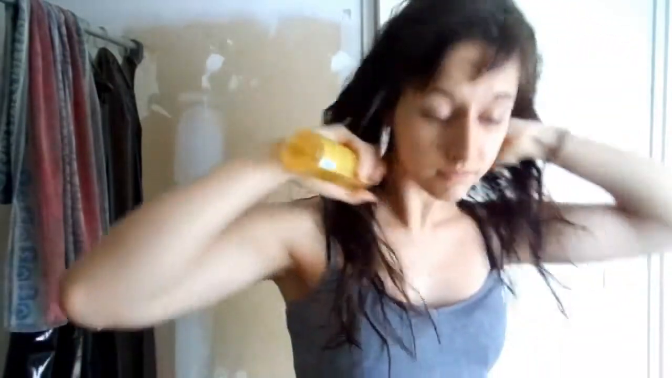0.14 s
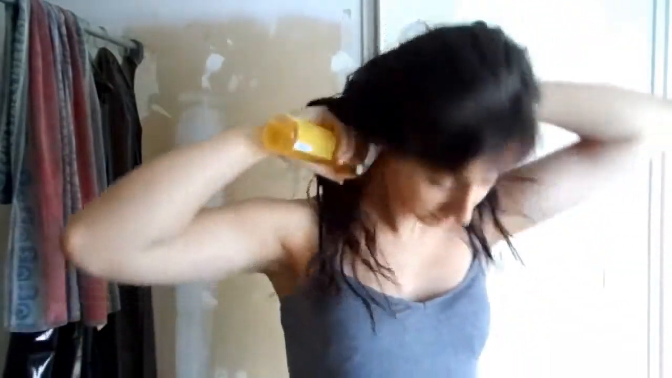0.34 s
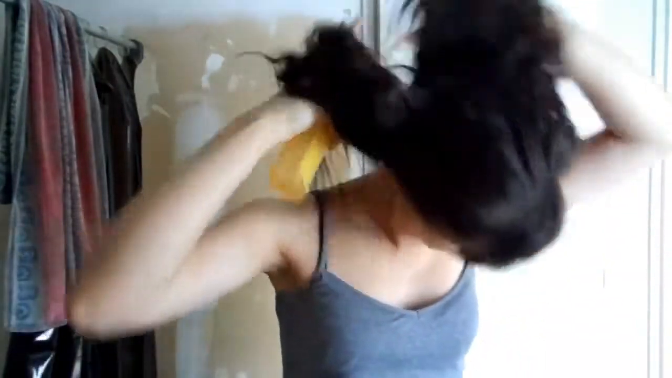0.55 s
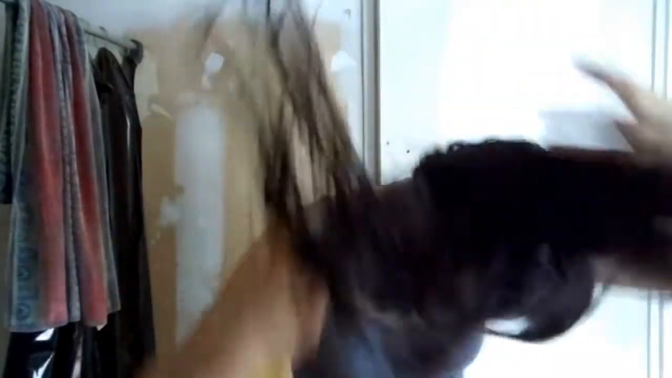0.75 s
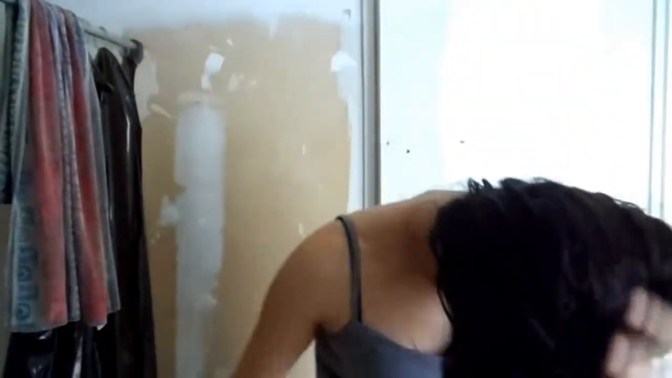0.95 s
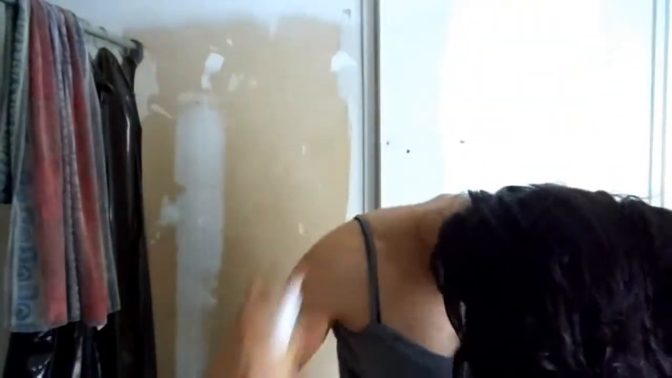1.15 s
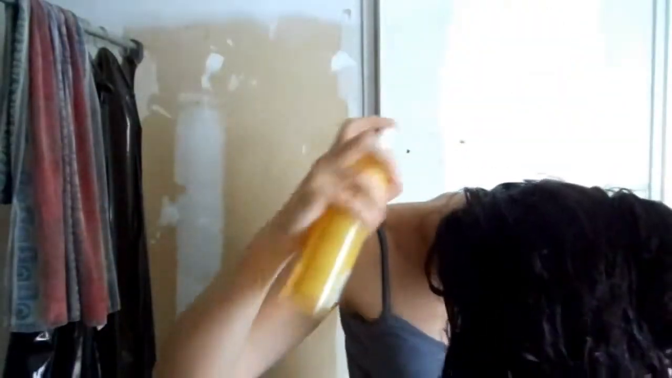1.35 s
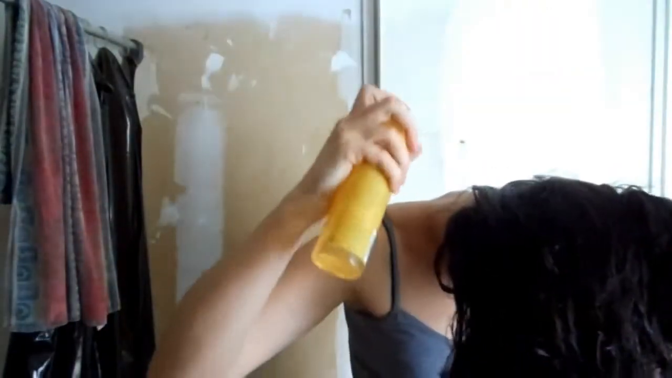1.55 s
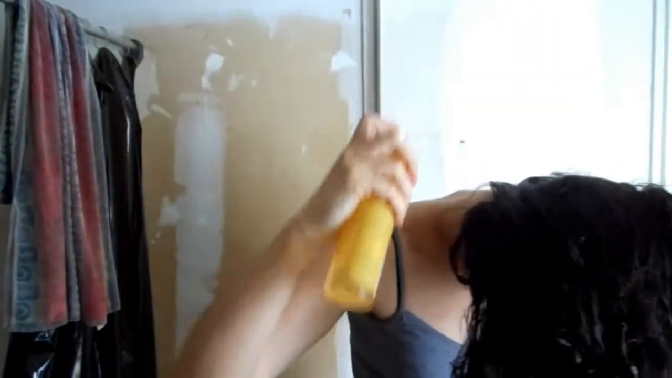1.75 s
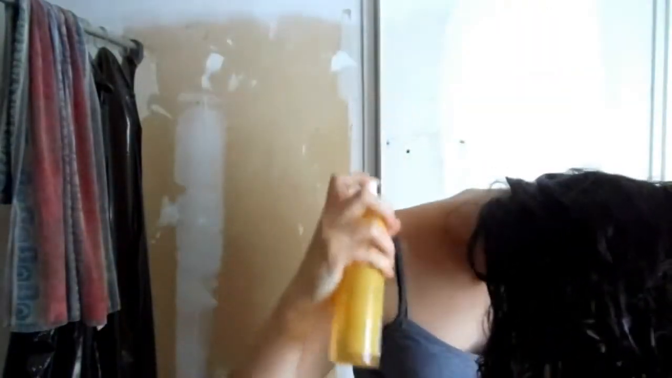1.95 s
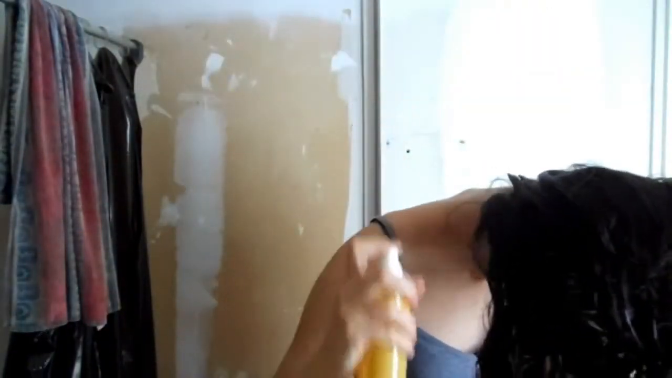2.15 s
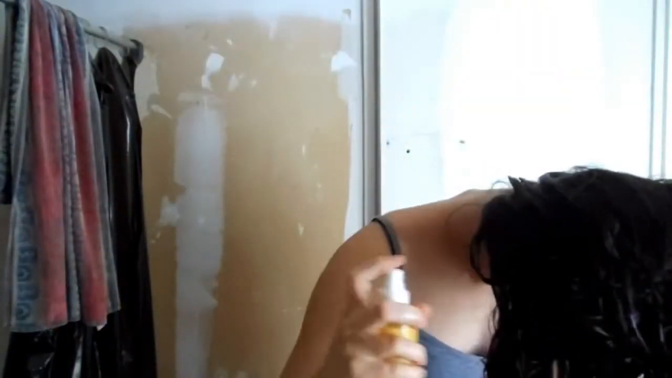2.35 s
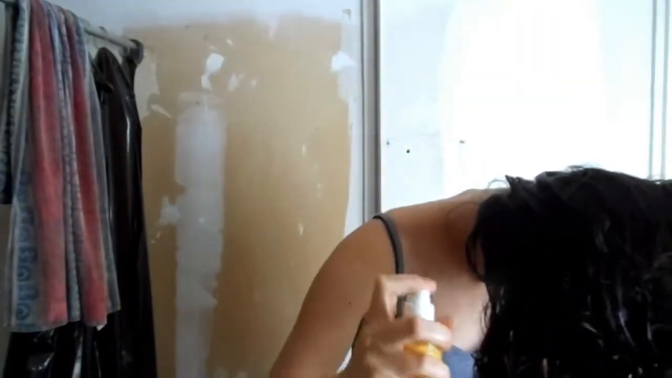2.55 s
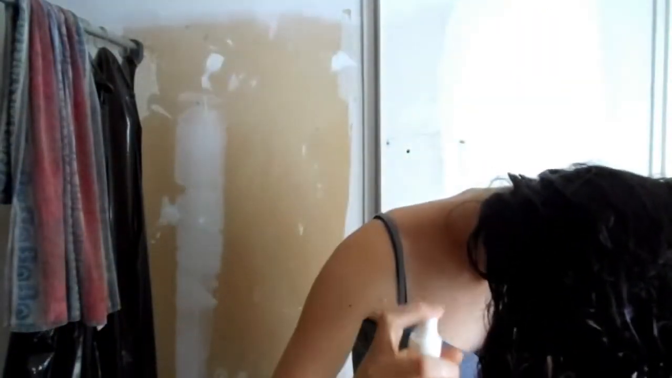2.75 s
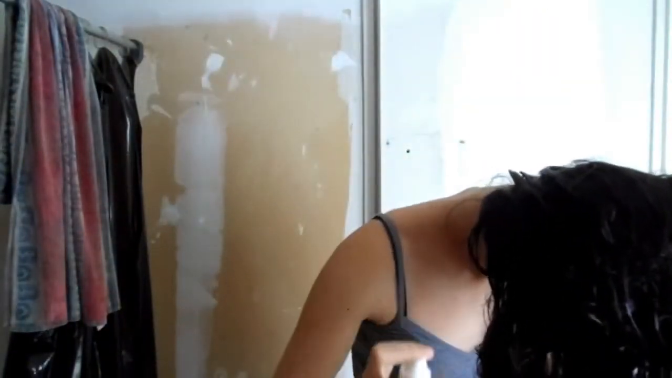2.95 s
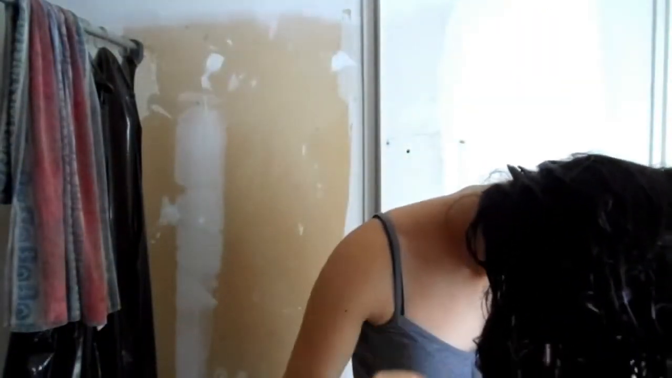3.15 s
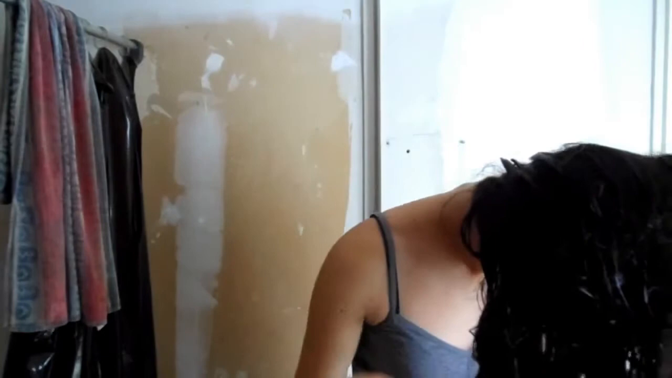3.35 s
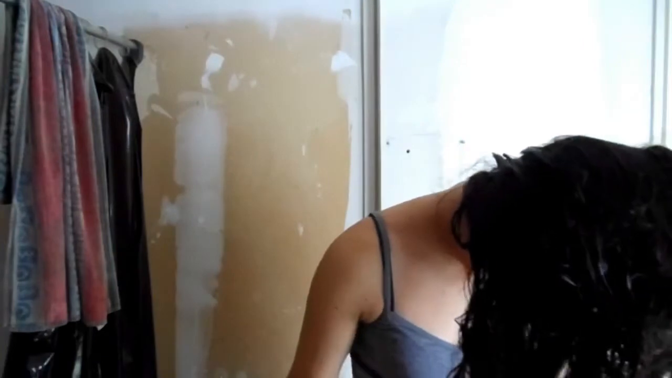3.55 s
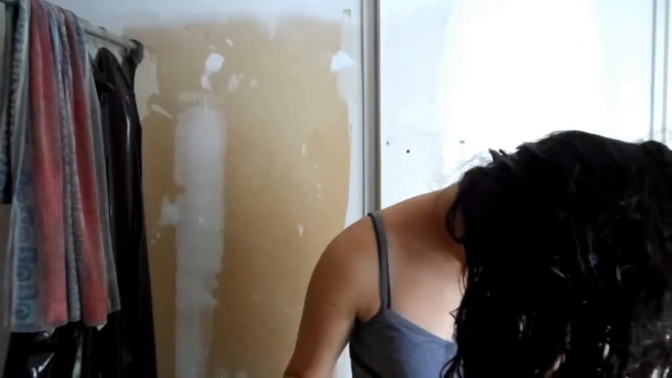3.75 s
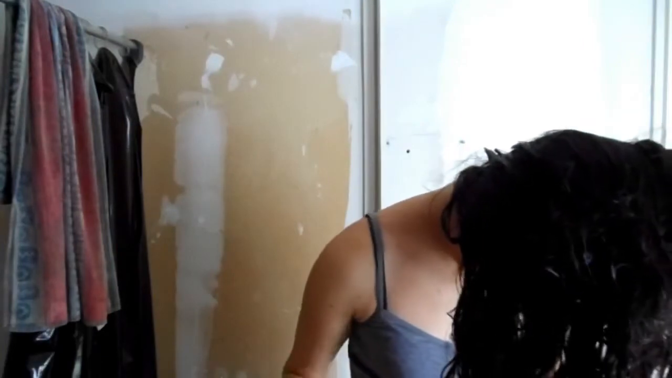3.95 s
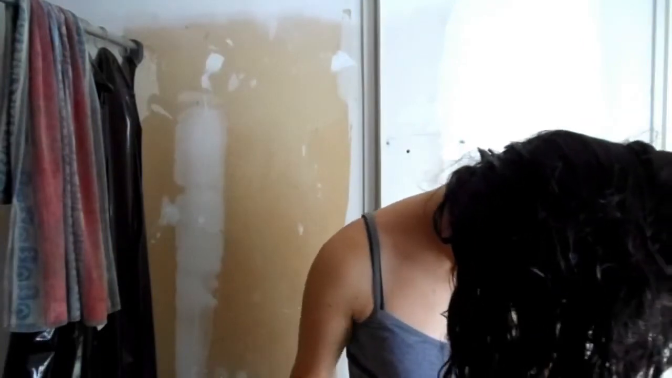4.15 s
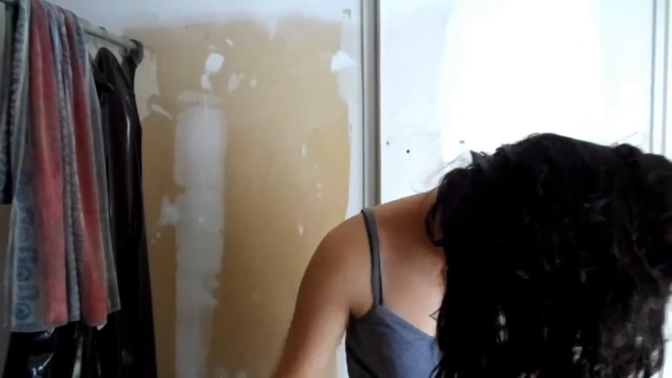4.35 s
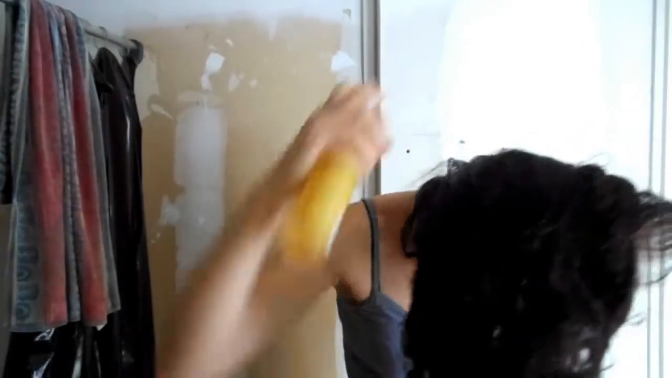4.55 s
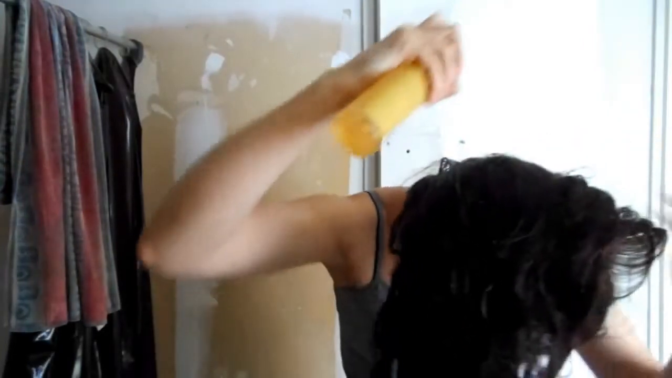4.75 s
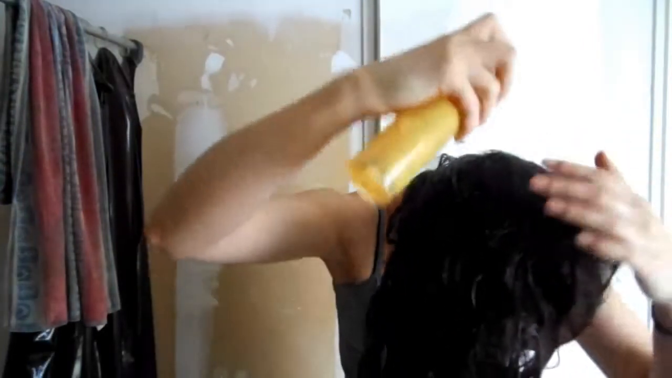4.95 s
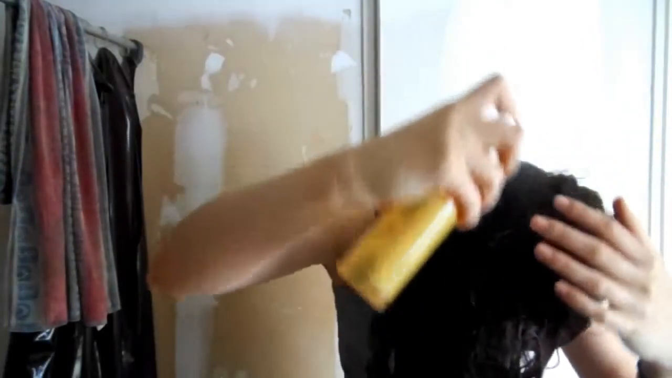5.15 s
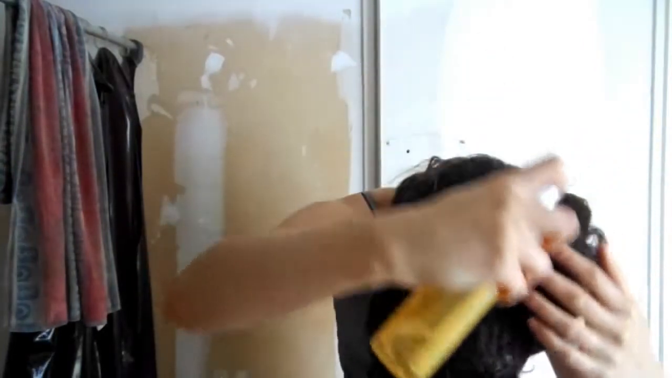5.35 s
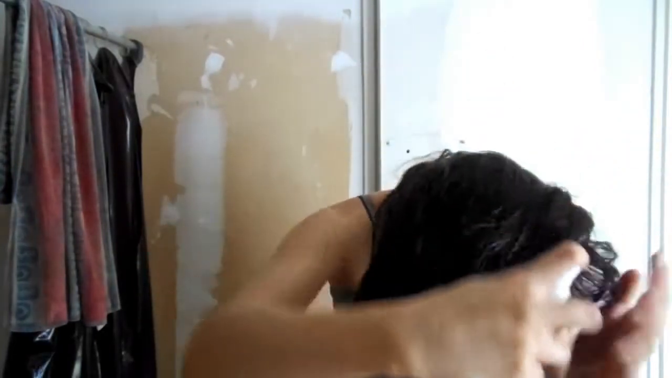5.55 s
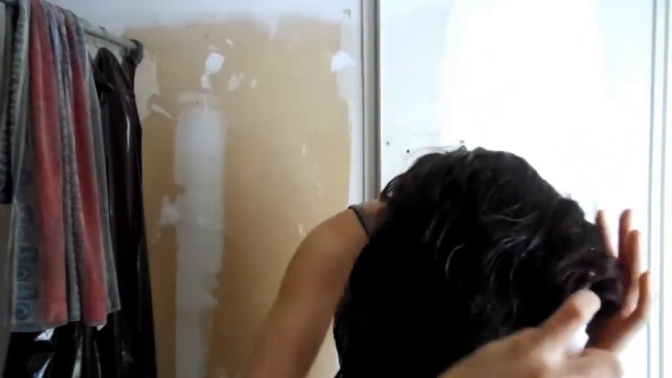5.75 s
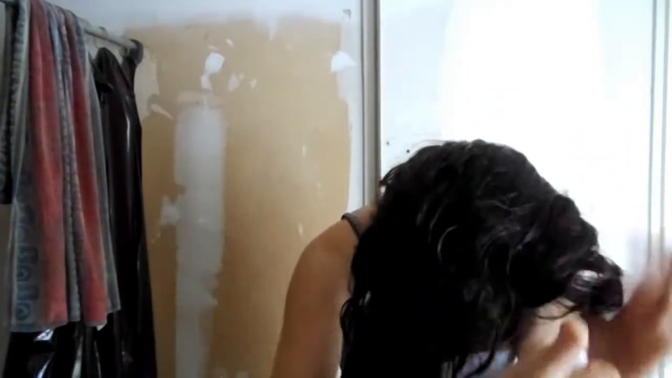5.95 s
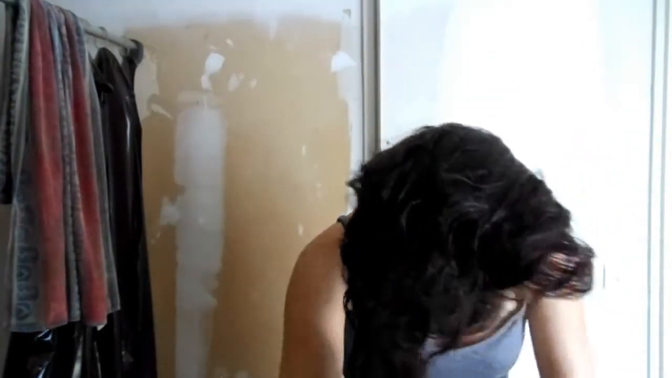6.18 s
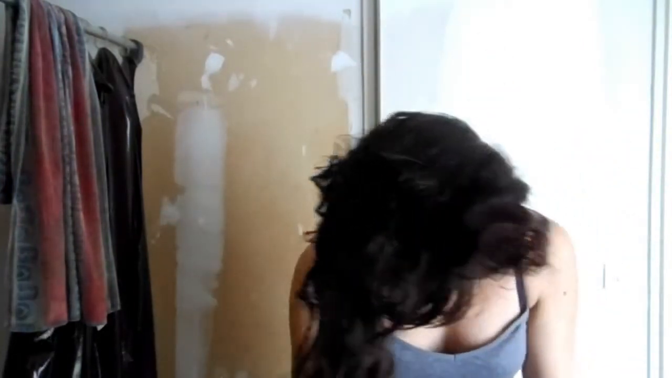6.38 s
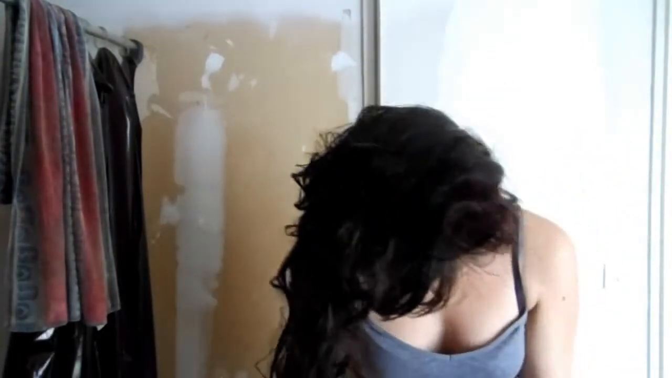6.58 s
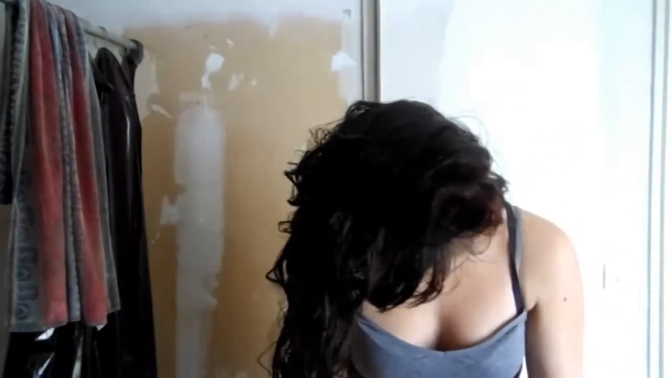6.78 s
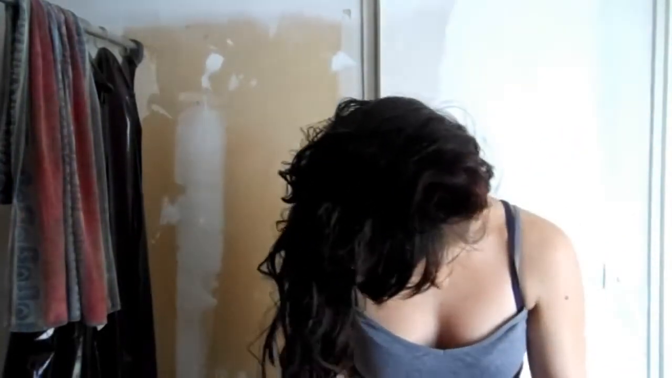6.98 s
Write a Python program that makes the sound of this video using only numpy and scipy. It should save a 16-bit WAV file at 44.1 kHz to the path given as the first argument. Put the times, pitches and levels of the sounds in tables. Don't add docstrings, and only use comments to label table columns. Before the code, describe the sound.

Close, crisp trigger squirts of fine mist repeat about three times a second, each clicking back, with wet hair flicks and faint hum.

```python
import sys
import numpy as np
from scipy import signal
from scipy.fft import rfft, irfft
from scipy.io import wavfile
from scipy.ndimage import uniform_filter1d

SR = 44100
rng = np.random.default_rng(int(sys.argv[2]) if len(sys.argv) > 2 else 0)


def makeup_ratio(level_db):
    decades = np.asarray(level_db, float) / 20
    return 10 ** decades


def dump(signal):
    limited = np.clip(np.atleast_2d(signal).T, -1, 1)
    pcm = np.round(limited * 32767).astype(np.int16)
    wavfile.write(sys.argv[1], SR, pcm)


N = 309582

# [f/Hz, density/dB]
FLOOR = [(12, -47), (20, -22.5), (58, -20.5), (126, -3.5), (190, -15.5), (244, -10.5), (339, -12.5),
         (378, -11.5), (692, -16), (1710, -20.5), (2660, -21.5), (3220, -22.5), (7760, -26.5), (14200, -33)]
# [f/Hz, likeness/0-1]
FLOOR_LIKENESS = [(20, 0.3), (60, 0.62), (180, 0.49), (540, 0.13), (1640, 0.15), (4930, 0.04),
                  (14800, 0.017)]
# [f/Hz, width/Hz, level/dB]
HUM = [(27.2, 15, -59.5), (122, 12.5, -62), (139.7, 15, -66.5), (7850, 45, -72.5)]
# [t/s, level/dB]
FAR_MOTOR = [(0.0, -70), (0.96, -64), (1.7, -71), (2.25, -63.5), (3.3, -67), (4.83, -63), (5.02, -73),
             (5.7, -66), (5.79, -58), (5.88, -64), (6.0, -57), (6.22, -54), (6.45, -59), (6.6, -71),
             (6.74, -56), (6.83, -67), (7.02, -57)]
# [f/Hz, likeness/0-1]
ROOM_LIKENESS = [(300, 0.92), (3000, 1), (6000, 0.58), (9000, 0.18), (14000, 0.14)]
# [t/s, level/dB]
RUSTLE = [
    [(0.0, -72), (0.53, -68), (0.814, -73), (1.056, -59), (1.082, -65), (1.336, -84), (1.6, -79)],
    [(6.78, -81), (6.85, -63), (6.95, -82)],
]
# [t/s, f/Hz, width/Hz, peak
# level/dB, t60/s]
SHORT_BURSTS = [(6.682, 2400, 2600, -44, .04), (.87, 4800, 1200, -50, 0.018), (0.942, 4900, 1000, -49, 0.018),
                (1.038, 790, 830, -49, 0.04), (1.908, 5000, 680, -34, 0.03), (1.9145, 5200, 600, -30.5, 0.035),
                (2.176, 5100, 900, -40, 0.022), (5.0735, 5130, 1100, -36, 0.018), (5.8, 2500, 600, -44, 0.03),
                (6.363, 2600, 700, -43, 0.07), (6.3265, 2200, 2200, -44, .015),
                (6.964, 2750, 1100, -43.5, 0.028), (4.614, 2500, 1500, -49.5, .04),
                (.325, 11500, 4500, -52, .06), (.5, 4400, 4000, -54, .04), (.507, 12000, 3500, -50, .03),
                (.957, 8600, 6000, -48, 0.026), (1, 3200, 1400, -55, 0.037), (1.153, 7800, 500, -58, .12),
                (.899, 11000, 3000, -50, .02), (1.007, 1980, 700, -52, 0.047), (1.053, 3050, 630, -47, .03),
                (1.855, 5500, 1000, -45, 0.023), (2.52, 1940, 750, -41.5, 0.05), (2.868, 2000, 1100, -43, 0.043),
                (4.575, 5800, 620, -48, 0.026), (4.815, 1800, 300, -44, 0.064),
                (4.325, 5300, 1500, -34.5, 0.034), (6.348, 2350, 880, -41, 0.034),
                (6.051, 1930, 860, -37.5, 0.022), (6.29, 2300, 600, -49.5, 0.028),
                (5.778, 6000, 1200, -34, 0.023), (3.578, 5500, 1500, -42, .03), (3.64, 3950, 900, -45, .03),
                (6.33, 440, 300, -45.5, 0.087), (4.82, 450, 250, -43, .07), (5.754, 410, 300, -44, 0.044),
                (5.754, 2000, 1700, -48, .02), (.9, 2800, 1500, -50, 0.043), (1.035, 2400, 3000, -47, .04)]
# [t/s, peak level/dB, snap/dB, rattle t60/s, brightness/dB per octave]
FLICKS = [(.4439, -35, 1.5, .04, 4), (1.034, -25.5, -4, 0.05, 4), (5.0745, -31, 1.5, .03, -4),
          (5.469, -31, 0, .03, 0), (5.7975, -25, 2, .03, 1), (5.8025, -26, 3, .02, 2),
          (5.823, -30, 0, .03, 1), (5.7835, -24, 2, .02, 1), (6.291, -23.5, 3, 0.025, 4.5),
          (6.3638, -17, 5, .02, 6), (6.3495, -24, 0, .02, 2), (6.6815, -21, 5.5, 0.021, 2.5),
          (6.8369, -38, 1.5, .04, 1.1)]
TOUCHES = [(2.2368, -29.5, -4, -42.5, -69), (3.29, -33.5, -2, -58, -70), (3.6386, -28, -1, -47.5, -68),
           (3.986, -28, 2, -50, -70), (4.8514, -34, 7, -37, -60), (5.1337, -23, 1, -55, -67)]
PRESSES = [(1.624, -31, 6, -38.5, -61), (1.908, -24, -2.2, -34.5, -46), (2.2666, -31, 7, -40.5, -57),
           (2.6274, -36, 8, -40, -52), (2.973, -29, 1, -38.5, -48.5), (3.319, -30, 1.1, -41, -47),
           (3.6691, -30, 4, -41, -51), (4.0257, -34, 1.1, -41, -44), (4.3191, -24, -1, -48, -42.5),
           (4.8125, -26, 4, -36.5, -48), (5.17, -35, 3, -37.5, -56), (5.518, -33, -2, -46, -59),
           (6.0518, -13, 5, -38.5, -42)]
RELEASES = [(1.8176, -29, 1.1, -55, -60), (2.142, -27.5, -1.5, -44, -49), (2.4872, -25.5, 0.5, -46.5, -46),
            (2.8326, -25.5, 1.5, -44.5, -46), (3.188, -29, -1, -47.5, -47), (3.5397, -27, 1.5, -45.5, -42),
            (3.873, -33, .1, -46, -47), (4.2366, -26, 1.5, -48, -45), (4.575, -29, 2.5, -46.5, -44.5),
            (5.053, -30, 0, -55, -60), (5.384, -23.5, 3, -46.5, -60), (5.7273, -28, .6, -58, -71)]
RETURNS = [(1.8553, -24, -1, -47, -45.5), (2.1764, -21, .1, -43, -47), (2.5216, -19.5, 0, -45.5, -42.5),
           (2.8672, -18, -0.5, -47.5, -46), (3.2228, -18, 2, -47, -42.5), (3.5775, -20, 2.5, -48.5, -43),
           (3.91, -22.5, -1, -46.5, -46), (4.2777, -26.5, 1, -48, -45.5)]
TIPPED_RETURNS = [(5.4478, -20, 2.1, -51, -52), (5.7789, -16, 4, -42, -53)]
LAST_RETURNS = [(6.3458, -15, 4, -44.5, -49)]
# [knock lead on tick/s, cap mode level/dB, air t60/s, snap/dB, rattle t60/s]
TOUCH = (.001, -56, .035, .5, .045)
PRESS = (-.001, -54, .036, -1.5, .042)
RELEASE = (.027, -54, .04, 1.5, .05)
RETURN = (.006, -50.5, .045, 1.5, .042)
TIPPED_RETURN = (.024, -53, .033, 2.2, .04)
LAST_RETURN = (.017, -56, .033, 1.0, .04)
# [t/s, air mode level/dB, air mode f/Hz, wall mode
# level/dB, air t60/s]
SINGLE_KNOCKS = [(1.794, -43, 430, -47, .04), (5.025, -41, 490, -56, .11), (5.1345, -40, 490, -65, .12),
                 (5.755, -43, 410, -60, .05), (1.038, -47, 288, -47, 0.04), (4.331, -39.5, 463, -50, 0.094),
                 (4.358, -44, 478, -60, 0.056), (4.832, -44, 402, -55, .04), (5.083, -34.5, 486, -56, .11),
                 (5.203, -42, 413, -42, .042), (5.301, -44, 457, -64, 0.036), (5.597, -45.5, 480, -52, .075),
                 (5.683, -51, 395, -63, .04), (5.4185, -37.5, 450, -56, 0.031), (1.925, -40, 348, -50, 0.047)]
# [f/Hz, t60/s]
WALL = [(1130, 0.019)]
# [f/Hz, t60/s]
CAP = [(1800, 0.022), (2050, 0.016), (2400, 0.012)]
# [t/s, air mode f/Hz, cap echo/0-1, treble gain of the aim/dB, low part of the mist/dB]
POSE = [(1.7, 435, .13, .8, -14.5), (2.0, 433, 0.11, 3, -13), (2.35, 430, 0.14, .1, -14),
        (2.7, 410, 0.1, 1.2, -12), (3.05, 407, 0.23, 0, -13), (3.4, 423, 0.19, 0.5, -14.5),
        (3.75, 443, 0.1, 1, -13), (4.1, 454, 0.02, 0.5, -13), (4.45, 455, 0, 1.5, -15.5),
        (4.9, 430, 0, 2.5, -11.5), (5.1, 487, 0.04, 1, -10.5), (5.3, 475, 0.06, 2, -11),
        (5.55, 450, 0.06, 3, -17.5), (6.1, 445, .04, 1.1, -16.5)]
# [valve opens t/s, rise to peak/s, push length/s, peak level/dB, early flow re peak/dB]
STROKES = [(1.624, 0.092, 0.14, -31, -2.5), (1.923, 0.078, 0.15, -31, -6),
           (2.267, 0.082, 0.14, -28.5, -4.5), (2.626, 0.1, 0.14, -31, -3), (2.974, 0.083, .14, -29.5, -4),
           (3.32, 0.097, 0.13, -29, -3), (3.668, 0.08, 0.14, -31, -2.5), (4.026, 0.064, 0.15, -33.5, -2),
           (4.346, 0.13, 0.15, -34, -1.5), (4.852, .096, 0.13, -33, -2.5), (5.172, 0.052, 0.14, -32, -4),
           (5.518, 0.077, 0.11, -33.5, -4), (6.051, .062, 0.12, -35.5, -3)]
# [t/s, level/dB, length/s, low part re mist/dB]
SPITS = [(1.909, -36.5, 0.059, -4.5), (4.319, -33.5, .03, -7.5), (4.813, -38.5, 0.057, -3.5),
         (5.797, -43, 0.05, -13.5), (6.366, -41, 0.035, -9)]
# [f/Hz, density/dB]
MIST = [(530, -67), (900, -32), (1160, -12), (1270, -24.5), (1760, -11.5), (2460, -8.5), (3720, -3.5),
        (4320, -3), (6190, -1), (7100, 0.5), (7790, 0.5), (12700, 7), (14200, -2)]
# [f/Hz, likeness/0-1]
MIST_LIKENESS = [(1000, 1), (3000, 1), (5000, 1), (8000, 0.55), (14000, 0.07)]
# [f/Hz, difference/dB]
MIST_BALANCE = [(2000, -0.5), (4400, 0.4), (8000, -2.5), (14000, -2.5)]
# [f/Hz, width/Hz, level/dB]
CAP_SONG = [(1840, 220, -7.5), (2727, 200, -12), (3703, 210, -11.5), (5440, 270, -10)]

FLOOR_DB = -51
FAR_MOTOR_HZ, FAR_MOTOR_WAVER_HZ = 157.5, 1.53
ROOM_T60_S, ROOM_HIGH_T60_S, ROOM_DB = 0.32, 0.23, -2.5
TOP_EDGE_HZ = 14225
TICK_EDGE_HZ = 4300
REFILL_DB, REFILL_T60_S = -17, 0.22
SINGLE_KNOCK_CAP_DB = -60
CAP_FOLLOWS_DB_PER_DB, WALL_MEAN_DB = 0.42, -50
CAP_ECHO_HZ, BODY_ECHO = 1793, 0.13
OPEN_DB, EARLY_S = -9, 0.026
SPENT_DB, DYING_S, DEAD_DB = -4.5, 0.066, -28
TOP_HEAD_DB, TOP_HEAD_S = 4, 0.03
SPIT_FALL_DB = -14
LOW_DB_PER_DB, LOW_MOST_DB = 0.5, 4


def unit_rms(x):
    return x / np.sqrt(np.mean(x ** 2) + 1e-20)


def at_hz(points, hz):
    points = np.array(points)
    return np.interp(np.log(hz), np.log(points[:, 0]), points[:, 1])


def passed(x, hz, kind, order=2):
    return signal.sosfilt(signal.butter(order, hz, kind, fs=SR, output="sos"), x)


def band(x, hz, width_hz, order=2):
    return passed(x, [hz - width_hz / 2, hz + width_hz / 2], "band", order)


def drift(rate_hz):
    pole = np.exp(-40 * np.pi * rate_hz / SR)
    noise = rng.standard_normal(N // 20 + 2002)
    slow = signal.lfilter([1], [1, -2 * pole, pole * pole], noise)[2000:]
    return np.interp(np.arange(N) / 20, np.arange(len(slow)), unit_rms(slow))


def gated(tables, off_db):
    t, level_db = np.arange(N) / SR, np.full(N, float(off_db))
    for rows in map(np.array, tables):
        inside = (t >= rows[0, 0]) & (t <= rows[-1, 0])
        level_db[inside] = np.interp(t[inside], rows[:, 0], rows[:, 1])
    return level_db


def coloured(mid, side, spectrum, likeness):
    hz = np.maximum(np.fft.rfftfreq(N, 1 / SR), 10)
    alike = np.clip(at_hz(likeness, hz), 0, 1)
    pair = np.sqrt(1 + alike) * rfft(mid) + np.sqrt(1 - alike) * rfft(side) * [[1], [-1]]
    return unit_rms(irfft(pair * makeup_ratio(at_hz(spectrum, hz)), N))


def droplets(per_s, spread_db):
    sizes = makeup_ratio(spread_db * np.minimum(rng.exponential(1, N), 4)) * rng.standard_normal(N)
    return unit_rms(sizes * (rng.random(N) < per_s / SR))


def held(s, column):
    pose = np.array(POSE)
    return np.interp(s, pose[:, 0], pose[:, column])


def topless(x, depth_db):
    hz = np.fft.rfftfreq(N, 1 / SR)
    cut = np.interp(hz, [TOP_EDGE_HZ - 50, TOP_EDGE_HZ + 40, 16000, 16800], [0, 1, 1.9, 3])
    return irfft(rfft(x) * makeup_ratio(depth_db * cut), N)


def far_motor():
    hz = FAR_MOTOR_HZ + FAR_MOTOR_WAVER_HZ * drift(2.8)
    tone = np.sin(2 * np.pi * np.cumsum(hz) / SR)
    return unit_rms(tone) * makeup_ratio(1.7 * drift(7.0)) * makeup_ratio(gated([FAR_MOTOR], off_db=-70) - 1.5)


def background():
    out = makeup_ratio(FLOOR_DB - 1.0) * coloured(*rng.standard_normal((2, N)), FLOOR[:-1], FLOOR_LIKENESS)
    for hz, width_hz, db in HUM:
        both, left, right = band(rng.standard_normal((3, N)), hz, width_hz, order=1)
        out += makeup_ratio(db + 2.3 * drift(1.5)) * unit_rms(both + 0.4 * np.array([left, right]))
    return (out + far_motor()) * makeup_ratio([[-0.6], [0.6]])


def room(x):
    t = np.arange(N) / SR
    noise = coloured(*rng.standard_normal((2, N)), [(100, 0), (15000, 0)], ROOM_LIKENESS)
    lows = passed(noise, 2000, "low")
    low_tail = lows * makeup_ratio(-60 * t / ROOM_T60_S - 2.0)
    high_tail = (noise - lows) * makeup_ratio(-60 * t / ROOM_HIGH_T60_S)
    tail = (low_tail + high_tail) * (t > 0.004)
    tail = tail[:, :SR // 2] / np.sqrt(np.sum(tail ** 2) / 2)
    return makeup_ratio(ROOM_DB) * signal.fftconvolve(x.mean(axis=0, keepdims=True), tail, axes=1)[:, :N]


def rustle():
    grains = droplets(15000, spread_db=4.5) * makeup_ratio(2 * drift(23))
    grains = unit_rms(passed(grains, [1200, 11000], "band"))
    return grains * makeup_ratio(gated(RUSTLE, off_db=-120) + 0.5) * makeup_ratio([[-0.8], [0.8]])


def short_bursts():
    out, t = np.zeros(N + SR), np.arange(SR // 5) / SR
    for s, hz, width_hz, db, t60_s in SHORT_BURSTS:
        tone = unit_rms(band(rng.standard_normal(len(t)), hz, width_hz))
        envelope = makeup_ratio(db - 60 * t / max(t60_s, 0.005)) * np.minimum(t / 0.00033, 1)
        out[round(s * SR):][:len(t)] += envelope * tone
    return out[:N] * makeup_ratio([[-0.8], [0.8]])


def contacts():
    kinds = [(TOUCHES, TOUCH), (PRESSES, PRESS), (RELEASES, RELEASE), (RETURNS, RETURN),
             (TIPPED_RETURNS, TIPPED_RETURN), (LAST_RETURNS, LAST_RETURN)]
    return [tuple(row) + tuple(kind) for rows, kind in kinds for row in rows]


def ticks():
    out, t = np.zeros((2, 2, N + SR)), np.arange(4096) / SR
    hz = np.clip(np.fft.rfftfreq(len(t), 1 / SR), 100, None)
    rows = [(s, db, snap_db, rattle_s, tilt_db) for s, db, tilt_db, *_, snap_db, rattle_s in contacts()]
    for s, db, snap_db, rattle_s, tilt_db in rows + list(FLICKS):
        both, left, right = rng.standard_normal((3, len(t)))
        lot = rng.random(4)
        colour = makeup_ratio(tilt_db * np.log2(hz / 8000)) / np.sqrt(1 + (TICK_EDGE_HZ / hz) ** 4)
        colour *= makeup_ratio(3.0 * np.cos(2 * np.pi * (hz * (0.0001 + 0.000288 * lot[0]) + lot[1])))
        burst = unit_rms(irfft(rfft(both + 0.78 * np.array([left, right])) * colour, len(t)))
        snap = makeup_ratio(snap_db + 3.0 - 60 * t / 0.011)
        rattle = makeup_ratio(-60 * t / max(rattle_s, 0.002))
        rattle *= 1 + 0.32 * np.cos(2 * np.pi * t * (90 + 120 * lot[2]))
        lumps_db = 4.0 * np.cos(2 * np.pi * (t * (30 + 50 * lot[3]) + lot[2]))
        gurgle = makeup_ratio(REFILL_DB - 60 * t / REFILL_T60_S + lumps_db) * (t < 0.09)
        gurgle *= rattle_s > 0.036
        envelopes = np.array([[snap], [makeup_ratio(-2.5) * rattle + gurgle]]) * np.minimum(t / 0.0012, 1)
        out[..., round(s * SR):][..., :len(t)] += makeup_ratio(db - 13.0) * burst * envelopes
    return out[..., :N] * makeup_ratio([[-0.9], [0.9]])


def knock_rows():
    rows = []
    for s, _, _, db, wall_db, lead_s, cap_db, air_s, _, _ in contacts():
        cap_db = cap_db + CAP_FOLLOWS_DB_PER_DB * (wall_db - WALL_MEAN_DB)
        rows.append((s - lead_s, db, held(s, column=1), wall_db - db, cap_db - db, air_s, 1))
    for s, db, hz, wall_db, air_s in SINGLE_KNOCKS:
        rows.append((s, db, hz, wall_db - db, SINGLE_KNOCK_CAP_DB - db, air_s, 0))
    return rows


def knocks():
    out, t = np.zeros(N + SR), np.arange(SR // 5) / SR
    for s, db, air_hz, wall_db, cap_db, air_s, bouncing in knock_rows():
        modes = [(air_hz, np.clip(air_s, 0.01, 0.14), 0), (air_hz * 0.82, 0.02, -9), (air_hz * 1.13, 0.016, -11)]
        modes += [(hz, t60_s, wall_db + 1.5) for hz, t60_s in WALL]
        modes += [(hz, t60_s, cap_db + 5.5) for hz, t60_s in CAP]
        hit = np.zeros(len(t))
        for (hz, t60_s, mode_db), luck in zip(modes, rng.normal(0, 1, len(modes))):
            detuned_hz = hz * (1 + luck / (60 if hz < 900 else 20))
            hit += makeup_ratio(mode_db + 0.52 * luck - 60 * t / t60_s) * np.sin(2 * np.pi * detuned_hz * t)
        hit *= np.minimum(t / 0.0015, 1)
        for when, size in rng.random((2, 2)):
            late = round((0.002984 + 0.013 * when) * SR)
            hit[late:] += bouncing * 0.38 * (2 * size - 1) * hit[:-late]
        out[round(s * SR):][:len(t)] += makeup_ratio(db + 3.0) * hit
    return out[:N] * makeup_ratio([[-0.8], [0.8]])


def squirts():
    out = []
    for s, db, length_s, low_db in SPITS:
        out.append([(s, db, low_db), (s + 2 * length_s, db + 2 * SPIT_FALL_DB, low_db)])
    for s, rise_s, push_s, db, early_db in STROKES:
        shape = [(0, OPEN_DB), (EARLY_S, early_db), (max(rise_s, EARLY_S), 0),
                 (push_s, SPENT_DB), (push_s + DYING_S, DEAD_DB)]
        pose_low_db = held(s + rise_s, column=4)
        out.append([(s + late_s, db + under_db, pose_low_db + min(-LOW_DB_PER_DB * under_db, LOW_MOST_DB))
                    for late_s, under_db in shape])
    return out


def flows():
    out = np.zeros((2, N))
    for s, db, low_db in map(np.transpose, squirts()):
        span = np.arange(round(s[0] * SR), round(s[-1] * SR))
        levels_db = [np.interp(span / SR, s, db), np.interp(span / SR, s, db + low_db)]
        out[:, span] = np.maximum(out[:, span], makeup_ratio(levels_db))
    return uniform_filter1d(out, size=40)


def head_start():
    since_s = np.arange(N) / SR - np.array(STROKES)[:, :1]
    return TOP_HEAD_DB * np.sum(np.clip(1 - since_s / TOP_HEAD_S, 0, 1) * (since_s > 0), axis=0)


def echoes(high, low):
    out = np.zeros_like(high)
    whistle = passed(high + 1e-18, [4 * CAP_ECHO_HZ - 250, 4 * CAP_ECHO_HZ + 450], "band")
    cuts = [round((row[0] - 0.045) * SR) for row in STROKES] + [N]
    for row, a, b in zip(STROKES, cuts, cuts[1:]):
        when, size = rng.random((2, 6))
        taps, cap = np.zeros(160), held(row[0] + row[1], column=2)
        taps[0], taps[round(SR / CAP_ECHO_HZ)] = 1, cap
        np.add.at(taps, (6 + 120 * when ** 2).astype(int), BODY_ECHO * (2 * size - 1))
        taps /= np.sqrt(np.sum(taps ** 2))
        jet = high[:, a:b] + low[:, a:b] + 2.2 * cap * whistle[:, a:b]
        out[:, a:b] = signal.fftconvolve(jet, [taps], axes=1)[:, :b - a]
    return out


def jet_noise():
    mid, side = droplets(30000, spread_db=-1.0), droplets(30000, spread_db=1.0)
    jet = coloured(mid, side, MIST[:-1], MIST_LIKENESS)
    hz = np.maximum(np.fft.rfftfreq(N, 1 / SR), 10)
    balance = makeup_ratio(at_hz(MIST_BALANCE, hz) / 2 * [[1], [-1]])
    return irfft(rfft(jet) * balance * (hz < TOP_EDGE_HZ), N)


def mist():
    jet = jet_noise()
    high = unit_rms(passed(jet, 4820, "high", order=4))
    low = unit_rms(passed(jet, 4130, "low", order=4))
    song_scale = passed(jet, 5100, "low", order=4).std()
    for hz, width_hz, db in CAP_SONG:
        low = low + makeup_ratio(db + 5.1 * drift(12.0)) * band(jet, hz, width_hz) / song_scale
    top = passed(high, 11600, "high")
    aim_db = held(np.arange(N) / SR, column=3)
    body = (high - top) * makeup_ratio(0.74 * drift(22))
    high = body + top * makeup_ratio(0.74 * drift(25) + head_start() + aim_db)
    low = low * makeup_ratio(1.1 * drift(40))
    flow, low_flow = flows()
    sputter = makeup_ratio(0.5 * drift(72) + 0.43 * drift(270))
    return sputter * echoes(flow * high, low_flow * low)


def scene():
    spray, thuds, (snaps, rattles) = mist(), knocks(), ticks()
    soft = rattles + short_bursts() + rustle()
    reflected = room(makeup_ratio(-8.0) * spray + makeup_ratio(-1.5) * thuds + makeup_ratio(-1.5) * (snaps + soft))
    far = reflected + background()
    return makeup_ratio(0.13) * thuds + snaps + topless(spray + soft + far, depth_db=-50)


def low_pass(x):
    return signal.sosfilt(signal.butter(12, 16430, fs=SR, output="sos"), x)


def record(dry):
    mix = topless(dry, depth_db=-13)
    return low_pass(mix)


dry = scene()
out = record(dry)
dump(out)
```